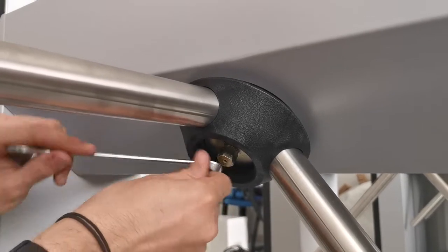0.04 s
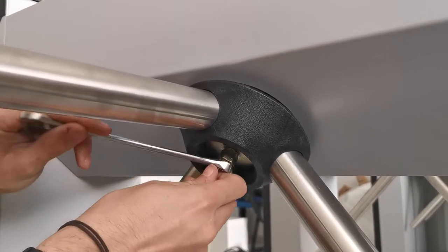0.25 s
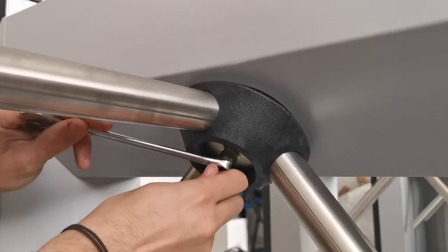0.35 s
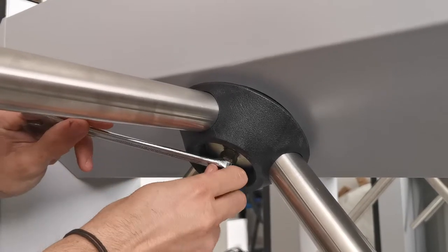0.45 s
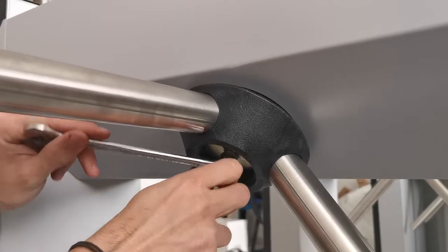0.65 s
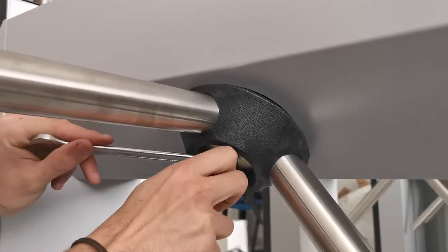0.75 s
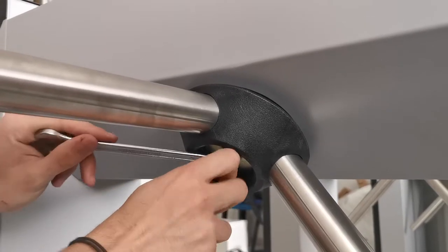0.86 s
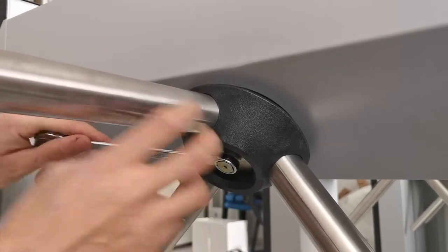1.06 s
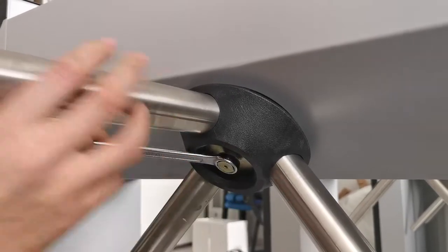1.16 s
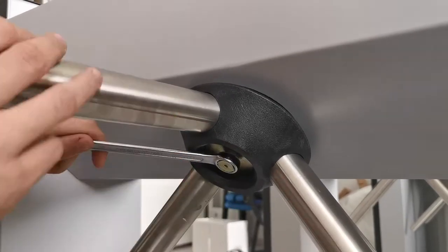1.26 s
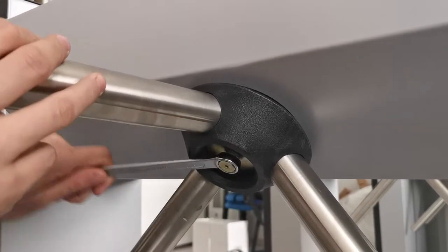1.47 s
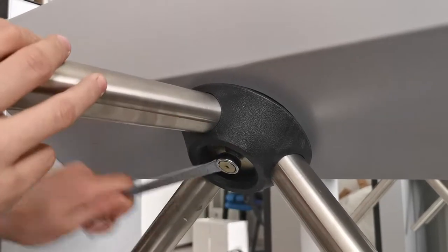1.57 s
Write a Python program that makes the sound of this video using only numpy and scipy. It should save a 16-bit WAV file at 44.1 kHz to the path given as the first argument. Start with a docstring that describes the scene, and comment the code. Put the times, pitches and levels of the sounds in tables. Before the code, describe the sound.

A steel wrench scrapes faintly onto a bolt, seats with a sharp bright clack, then clacks again half a second later; metal legs ring briefly and the table thuds softly. Close phone microphone, small quiet humming room.

```python
"""A scrape and a faint click open, then hard steel clacks: a wrench slides onto a hub bolt, close to a phone.
Each clack is a noise crack, a rattle and a chirp, with short wrench modes and the longer ring of steel legs.
The table top thrums late on swelling sines; the scrape before the jaw seats is a dense rain of micro-clicks.
A hand closes on a leg, damps it and brushes it in thin filtered noise.
A small room answers with noise reflections; a low flickering hum and faint wide hiss lie underneath."""
import sys
import numpy as np
from scipy import signal
from scipy.fft import rfft, irfft
from scipy.io import wavfile
from scipy.ndimage import uniform_filter1d

SR = 44100
rng = np.random.default_rng(int(sys.argv[2]) if len(sys.argv) > 2 else 0)


def decibels_to_gain(level_db):
    """Convert a level in decibels to a linear amplitude gain (20 dB per decade)."""
    exponent = np.asarray(level_db, float) / 20
    return 10 ** exponent


def wav_out(sig):
    """Save sig, one row per channel (or a flat mono array), as 16-bit PCM at SR to the path in sys.argv[1]."""
    wavfile.write(sys.argv[1], SR, np.round(np.clip(np.atleast_2d(sig).T, -1, 1) * 32767).astype(np.int16))


N = 70560  # 1.6 s
T = np.arange(N) / SR

# Blows of wrench on bolt: start_s, level_db, brightness_hz, legs_share_db, contact_place (0-1)
CLACK_BLOWS = [(.0005, -54.5, 5090, -6, .6), (.1940, -46, 4820, -18, .6), (.2082, -27, 4500, 1, .6),
               (.2115, -33, 2430, -23.5, .6), (.3605, -47, 4470, -25, 0.22), (0.3625, -42.5, 2138, -7, 0.8),
               (.3650, -48.5, 918, 12.5, 0.41), (0.7547, -48.5, 2670, -22.5, 0.44),
               (.7618, -31.5, 4030, -24.5, 0.05), (.7645, -31, 3600, 3, .267),
               (.7765, -43.5, 3320, -17, 0.33), (.8900, -56.5, 3260, -19, .5),
               (0.8918, -49, 4150, -32, 0.48), (.8950, -48, 880, 10, 0.42)]
# Ringing modes of the wrench: pitch_hz, level_db, t60_s, left_minus_right_db
WRENCH_MODES = [(2062, -6, .12, -1), (2250, -7, .1, -1), (2333, -9, .1, 0), (2640, -6, .07, 0),
                (3386, -8, .17, 4), (3585, -4, .11, 4), (3715, -8, .08, 2), (3915, -8, .07, -2),
                (4075, 0, .1, -2), (4420, -4, .05, -2), (4750, -4, .05, -2), (5045, -6, .06, 0),
                (5750, -16, .06, 0), (7900, -24, .04, 0)]
# Ringing modes of the steel legs: pitch_hz, level_db, t60_s, left_minus_right_db
LEG_MODES = [(561, -17.5, 0.5, -2.5), (692, -12, 0.41, -0.5), (877, -4.5, 0.18, -4.5),
             (1109.5, -12, 0.11, -2.5), (1840, -18.5, 0.12, 9.5), (2010, -25, .25, 0.5),
             (3262, -25, 1.15, 3), (3295.5, -26, 1.3, 3), (3342, -11.5, 0.36, 4), (3580, -17.5, 0.43, 1.5),
             (3550, -19, 0.24, -2)]
# Spectrum of the impact noise: freq_hz, level_db (per Hz)
CRACK_COLOUR = [(240, -55.5), (400, -30.5), (906, -11), (1460, -9), (2630, -0.5), (3070, -11.5),
                (4110, -3.5), (10100, -17.5), (13300, -28.5), (16000, -48.5)]
PLACE_DB, SCATTER_DB, DETUNE = 7.0, 1.0, .001  # mode level by contact place, by chance; pitch by chance (ratio)
RISE_S = 0.00029
CRACK_DB, CRACK_T60_S = 10.5, 0.021
SNAP_DB, SNAP_T60_S = 15.5, 0.007
RATTLE_DB, RATTLE_T60_S, RATTLE_HZ = -6.5, 0.11, 3004
LEFT_LEAD_S = .00024  # the left side hears the sound first
GRIP_S, GRIP_T60_S = 1.17, .55  # the hand closes on a leg and damps it

# Jaw scraping over time: time_s, level_db
SCRAPE_LEVEL = [(0, -40), (.015, -64), (.045, -50.5), (.075, -55), (.11, -79), (.135, -69), (.15, -58),
                (.185, -51.5), (.205, -47), (.212, -95.5), (.73, -96), (.745, -68), (.758, -46),
                (.765, -105)]
# Spectrum of the scrape: freq_hz, level_db (per Hz)
SCRAPE_SPECTRUM = [(590, -27), (1000, -4.5), (1310, -15), (1850, 0), (3150, -11.5), (4900, -2.5),
                   (6330, -14), (7270, -11.5), (13400, -21.5), (16000, -41.5)]
SCRAPE_GRAINS_PER_S, SCRAPE_SCATTER_DB = 3300, 1.5
# Table-top resonances: start_s, pitch_hz, level_db, rise_s, t60_s
TABLE_THRUMS = [(0.209, 262, -33, 0.039, 0.22), (.25, 148, -40.5, 0.031, .2),
                (.40, 174.1, -46, 0.041, 0.42), (0.753, 154.6, -42.5, 0.0079, 0.14),
                (0.753, 277, -32, .02, 0.19), (.80, 175, -41, 0.034, 0.67), (1.0, 66, -56, .04, 0.31),
                (1.35, 80.4, -44.5, 0.02, .3), (.93, 175, -61, 0.03, 0.2), (1.029, 290, -54.5, 0.015, 0.05),
                (1.5, 84.96, -54, 0.015, 0.36)]
# Hand brushing a leg over time: time_s, level_db
BRUSH_LEVEL = [(1.19, -84), (1.212, -75.5), (1.224, -64.5), (1.294, -62.5), (1.314, -67.5), (1.35, -84.5),
               (1.37, -82.5)]
# Spectrum of the brushing: freq_hz, level_db (per Hz)
BRUSH_SPECTRUM = [(2350, -54), (4000, -21.5), (5310, -14), (7790, -18), (9490, 1), (10300, -6.5),
                  (12400, -12.5), (13200, -8), (15000, -9), (16000, -16)]

# Spectrum of the room hum: freq_hz, level_db (per Hz)
HUM_SPECTRUM = [(12, -41), (20, -10), (75, -3), (137, -5), (300, 4), (440, -10), (497, -15.5), (552, -9.5),
                (693, -12.5), (770, -10.5), (901, -18), (966, -30), (1300, -36), (1690, -62), (2860, -120)]
# Slow swelling and sinking of the hum: time_s, level_db
HUM_LEVEL = [(0, -7), (.12, -2), (.3, 2), (.5, 1.5), (.66, -5), (.8, 3.5), (1.0, 3.5), (1.12, -3.5),
             (1.22, -0.5), (1.32, -2.5), (1.45, 1), (1.6, -0.5)]
# Narrow resonances in the hum: pitch_hz, width_hz, level_db
HUM_RESONANCES = [(312, 37, -65.5), (555, 21, -77.5), (745, 40, -75.5), (900, 30, -80.5)]
HUM_DB, HUM_FLICKER_DB, HUM_SWELL_DB = -54, 3.5, 1.5  # level ahead of its swell; depths of level wander
HUM_SIDE_DB = -10  # stereo width at 240 Hz
# Spectrum of the hiss: freq_hz, level_db (per Hz)
HISS_SPECTRUM = [(530, -32.5), (900, -4.5), (956, -21), (2240, -13.5), (3110, -24.5), (3350, -20),
                 (6390, -24.5), (8760, -24), (15200, -25.5), (16500, -33.5)]
# Swelling of the hiss: time_s, level_db
HISS_LEVEL = [(0, -5.5), (.5, -5.5), (.75, -1), (1.1, -1.5), (1.3, 1), (1.6, 2)]
HISS_DB, HISS_SIDE_DB = -72, 0.5  # level ahead of its swell; stereo width
# Room decay: freq_hz, t60_s
ROOM_DECAY = [(300, 1), (800, .4), (2000, 0.38), (5000, 0.32), (10000, 0.3)]
ROOM_DB, EARLY_DB, EARLY_T60_S = -5.5, -1.5, .045
RINGS_ROOM_DB = -8  # share of the wrench's ringing sent through the room
TOP_HZ = 15900


def unit(x):
    """Scale to rms 1."""
    return x / np.sqrt(np.mean(x ** 2))


def colour(x, points):
    """Shape the spectrum by (freq_hz, level_db) points on a log-frequency axis."""
    hz, db = np.array(points, float).T
    size = x.shape[-1]
    f = np.maximum(np.fft.rfftfreq(size, 1 / SR), 1)
    gain = decibels_to_gain(np.interp(np.log(f), np.log(hz), db, left=-90, right=-90))
    return irfft(rfft(x) * gain, size)


def octave_noise(hz, size):
    """Two independent noises, about an octave wide around hz."""
    shape = [(hz / 2, -30), (hz / 1.3, 0), (hz * 1.3, 0), (hz * 2, -30)]
    return colour(rng.standard_normal((2, size)), shape)


def curve(rows):
    """Gain over time from (time_s, level_db) rows, silent outside."""
    s, db = np.array(rows, float).T
    return decibels_to_gain(np.interp(T, s, db, left=-140, right=-140))


def fade(t, t60):
    """Exponential decay from t = 0, falling 60 dB in t60 seconds."""
    return (t >= 0) * np.exp(-np.log(1000) * np.maximum(t, 0) / t60)


def pan(db):
    """Left and right gains for a level difference."""
    return decibels_to_gain(np.array([[db], [-db]]) / 2)


def walk(rate):
    """Random levels held 1 / rate s and smoothed twice."""
    k = int(SR / rate)
    held = np.repeat(rng.standard_normal(N // k + 1), k)
    return 1.43 * uniform_filter1d(uniform_filter1d(held, k), k)[:N]


def reach(hz, bright_hz, width):
    """How well a contact of this brightness excites a frequency."""
    return 1 / np.hypot(1, (hz / bright_hz - bright_hz / hz) / width)


def ring(modes, t, bright_hz, place, chance):
    """Decaying modes, weighted by contact brightness and by their shape at the contact place."""
    out = 0
    ear_t = t + np.array([[LEFT_LEAD_S], [0]])
    for k, ((hz, db, t60, lr_db), (level_luck, pitch_luck)) in enumerate(zip(modes, chance)):
        mode_shape_db = PLACE_DB * np.cos(np.pi * (k + 1) * place)
        gain = decibels_to_gain(db + mode_shape_db + SCATTER_DB * level_luck) * reach(hz, bright_hz, 1.6)
        tone = np.sin(2 * np.pi * hz * (1 + DETUNE * pitch_luck) * ear_t)
        out = out + pan(lr_db) * gain * fade(t, t60) * tone
    return out * np.clip(t / RISE_S, 0, 1)


def clacks():
    """Every blow jolts out crack, rattle and snap, and sets wrench and legs ringing in their own modes."""
    span = int(.8 * SR)
    blows, wrench, legs = np.zeros(N), np.zeros((2, N)), np.zeros((2, N))
    chance = rng.standard_normal((len(CLACK_BLOWS), len(WRENCH_MODES), 2))
    steady = np.zeros((len(LEG_MODES), 2))  # the legs ring alike at each blow, without chance
    grit = rng.standard_normal((len(CLACK_BLOWS), span // 2))
    spectra = rfft(unit(colour(grit, CRACK_COLOUR)))
    f = np.fft.rfftfreq(span // 2, 1 / SR) + 1
    t = np.arange(span) / SR
    short = t[:span // 2]
    for (s, db, bright_hz, legs_db, place), luck, spectrum in zip(CLACK_BLOWS, chance, spectra):
        i = int(s * SR)
        near = slice(i, i + len(short))
        crack = decibels_to_gain(CRACK_DB) * irfft(spectrum * reach(f, bright_hz, 5.0)) * fade(short, CRACK_T60_S)
        # the dense wash of modes too close to tell apart
        rattle = decibels_to_gain(RATTLE_DB) * irfft(spectrum * reach(f, RATTLE_HZ, 2.0)) * fade(short, RATTLE_T60_S)
        # the jaw's brief chirp at the contact brightness
        snap = decibels_to_gain(SNAP_DB) * np.sin(2 * np.pi * bright_hz * short) * fade(short, SNAP_T60_S)
        blows[near] += decibels_to_gain(db) * (crack + rattle + snap) * np.clip(short / RISE_S, 0, 1)
        wrench[:, near] += decibels_to_gain(db) * ring(WRENCH_MODES, short, bright_hz, place, luck)
        leg_ring = ring(LEG_MODES, t, bright_hz, place, steady)
        legs[:, i:i + span] += decibels_to_gain(db + legs_db) * leg_ring[:, :N - i]
    grip = np.where(T > GRIP_S, fade(T - GRIP_S, GRIP_T60_S), 1)
    return blows, wrench, legs * grip


def scrape():
    """Dense uneven micro-clicks of steel sliding on steel."""
    hit = rng.random(N) < SCRAPE_GRAINS_PER_S / SR
    unevenness = decibels_to_gain(SCRAPE_SCATTER_DB * rng.exponential(size=N))
    grains = hit * rng.standard_normal(N) * unevenness
    return unit(colour(grains, SCRAPE_SPECTRUM)) * curve(SCRAPE_LEVEL)


def thrums():
    """Low table-top resonances that swell after a blow or a push, their phase wandering a little."""
    out = 0
    for s, hz, db, rise, t60 in TABLE_THRUMS:
        swell = np.clip((T - s) / rise, 0, 1) ** 2 * fade(T - s, t60)
        out = out + decibels_to_gain(db) * swell * np.sin(2 * np.pi * hz * T + 0.5 * walk(25))
    return out


def brush():
    """Thin bright hiss of skin on brushed steel, its level fluttering."""
    skin = unit(colour(rng.standard_normal((2, N)), BRUSH_SPECTRUM))
    return skin * curve(BRUSH_LEVEL) * decibels_to_gain(1.4 * walk(40.4))


def background():
    """Low room hum whose octave bands flicker apart, under a faint wide hiss."""
    sign = np.array([[1], [-1]])  # side signal is opposite in left and right
    hum = 0
    for hz in 30 * 2. ** np.arange(6):
        mid, side = octave_noise(hz, N)
        flicker = decibels_to_gain(HUM_FLICKER_DB * walk(12) + HUM_SWELL_DB * walk(4))
        width = decibels_to_gain(HUM_SIDE_DB) * (hz / 240) ** 0.27  # wider in the upper bands
        hum = hum + flicker * (mid + width * side * sign)
    hum = decibels_to_gain(HUM_DB) * unit(colour(hum, HUM_SPECTRUM)) * curve(HUM_LEVEL)
    mid, side = colour(rng.standard_normal((2, N)), HISS_SPECTRUM)
    hiss = unit(mid + decibels_to_gain(HISS_SIDE_DB) * side * sign) * curve(HISS_LEVEL)
    return hum + decibels_to_gain(HISS_DB) * hiss


def hum_tones():
    """Narrow wavering noise resonances that swell with the hum."""
    out = 0
    for hz, w, db in HUM_RESONANCES:
        peak = [(hz - 3 * w, -40), (hz - w / 2, -3), (hz, 0), (hz + w / 2, -3), (hz + 3 * w, -40)]
        tone = unit(colour(rng.standard_normal(N), peak))
        out = out + decibels_to_gain(db + HUM_SWELL_DB * walk(6.8)) * tone
    return out * curve(HUM_LEVEL)


def room(x):
    """Direct sound, quick reflections off the table top, and a tail that dies faster in the treble."""
    t = np.arange(SR // 2) / SR
    hz, t60 = np.array(ROOM_DECAY).T
    tail = 0
    for f in 250 * 2. ** np.arange(7):
        band_t60 = np.interp(np.log(f), np.log(hz), t60)
        tail = tail + octave_noise(f, len(t)) * fade(t - .004, band_t60)
    early = rng.standard_normal((2, len(t))) * fade(t - .0006, EARLY_T60_S)
    reply = (decibels_to_gain(ROOM_DB) * unit(tail) + decibels_to_gain(EARLY_DB) * unit(early)) / np.sqrt(len(t))
    reply[0, 0] += 1  # direct sound, left first
    reply[1, round(LEFT_LEAD_S * SR)] += 1
    return signal.fftconvolve(x, reply, axes=1)[:, :N]


def scene():
    """Near sounds and a share of wrench ring go through the room; all else, and the full wrench ring, stays dry."""
    blows, wrench, legs = clacks()
    low_cut = signal.butter(3, 420, "high", fs=SR, output="sos")
    near = signal.sosfilt(low_cut, blows + scrape() + brush())
    in_room = room(near + decibels_to_gain(RINGS_ROOM_DB) * wrench[1])
    return in_room + wrench + legs + thrums() + background() + hum_tones()


def band_limit(x):
    """A steep low-pass at the top of the band."""
    return signal.sosfilt(signal.butter(12, 16670, fs=SR, output="sos"), x)


def record(dry):
    """The phone cuts the top with a steep low-pass."""
    top_cut = signal.ellip(8, .2, 40, TOP_HZ, fs=SR, output="sos")
    mix = signal.sosfilt(top_cut, dry)
    return band_limit(mix)


dry = scene()
out = record(dry)
wav_out(out)
```